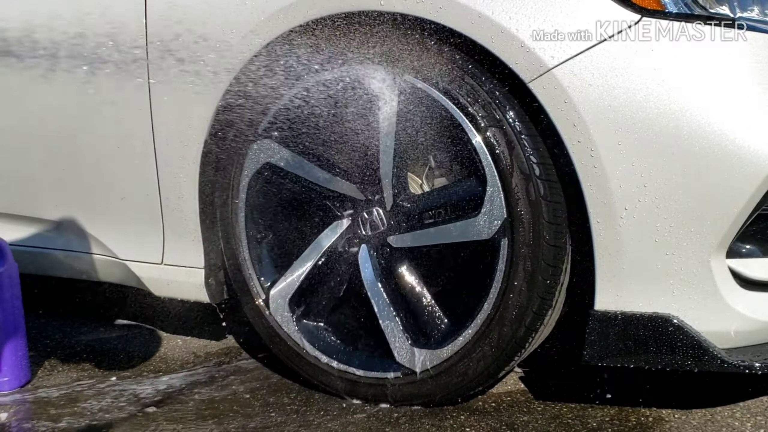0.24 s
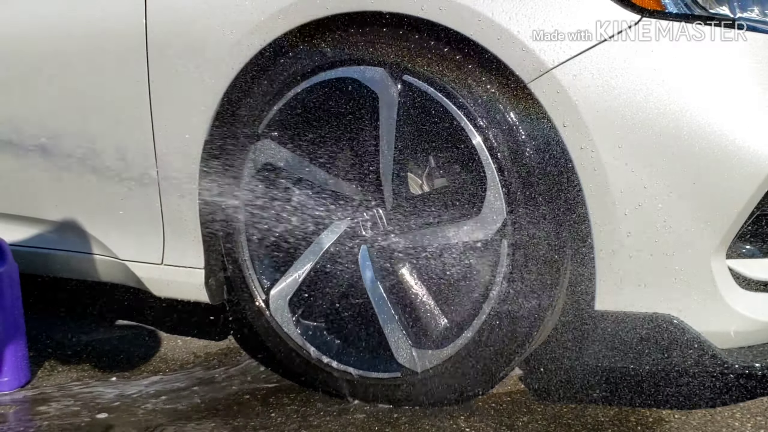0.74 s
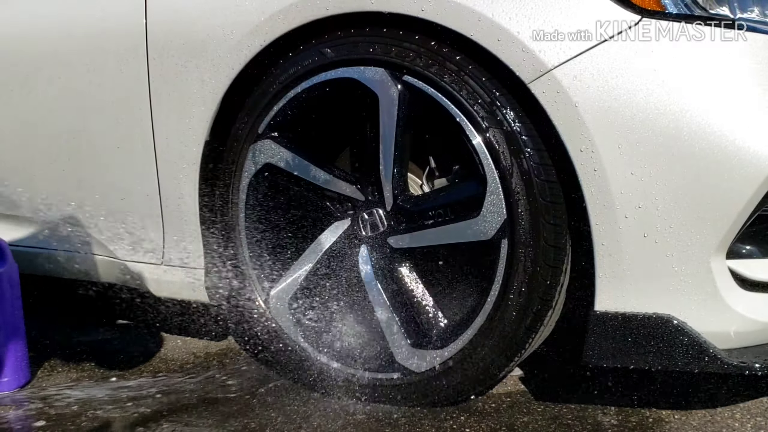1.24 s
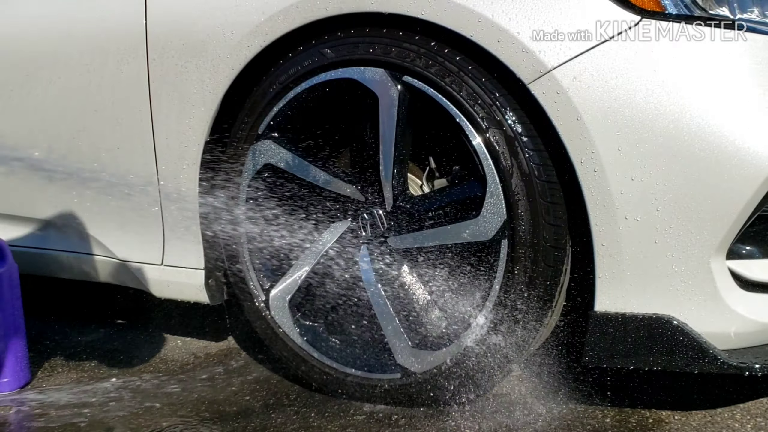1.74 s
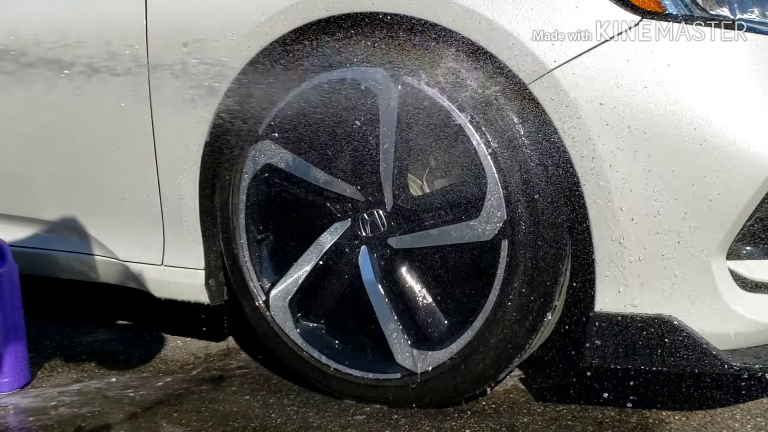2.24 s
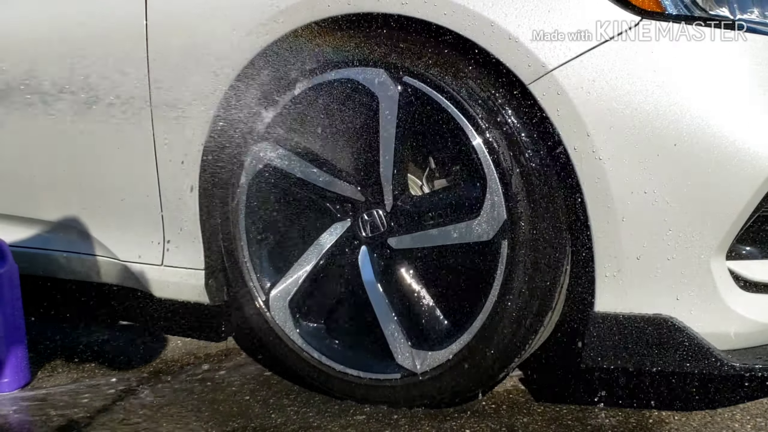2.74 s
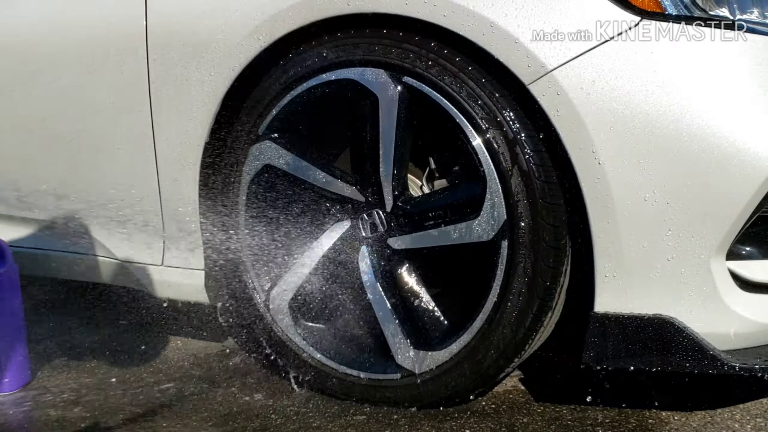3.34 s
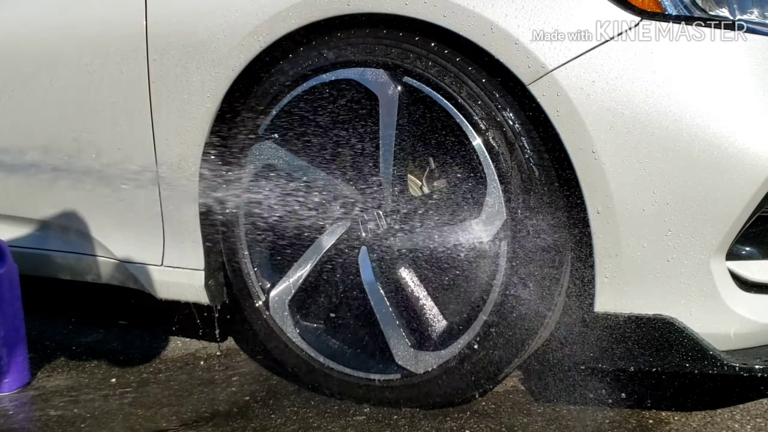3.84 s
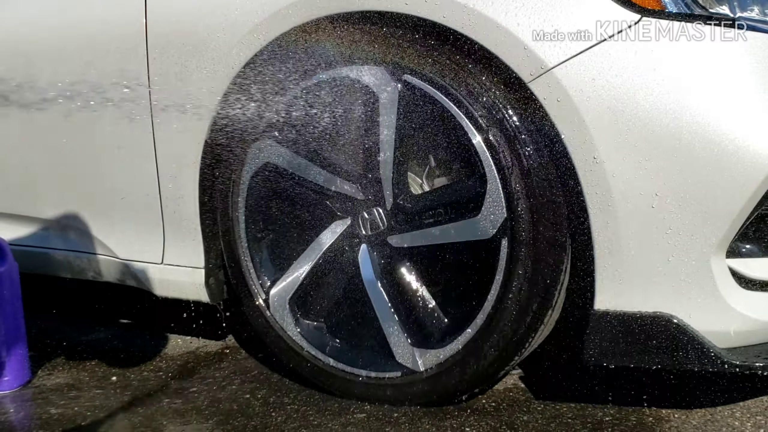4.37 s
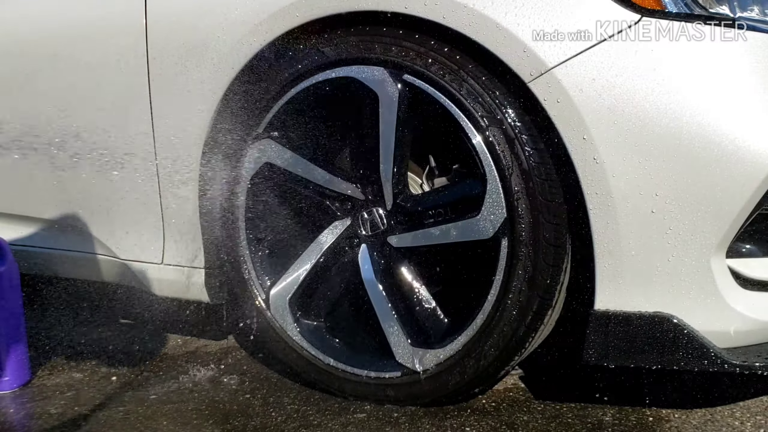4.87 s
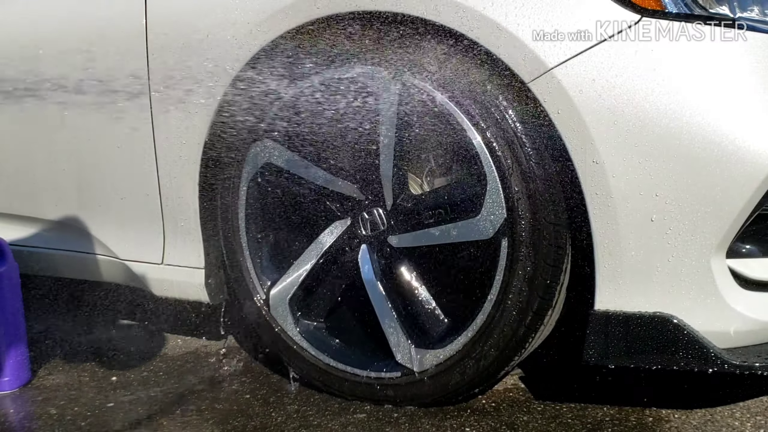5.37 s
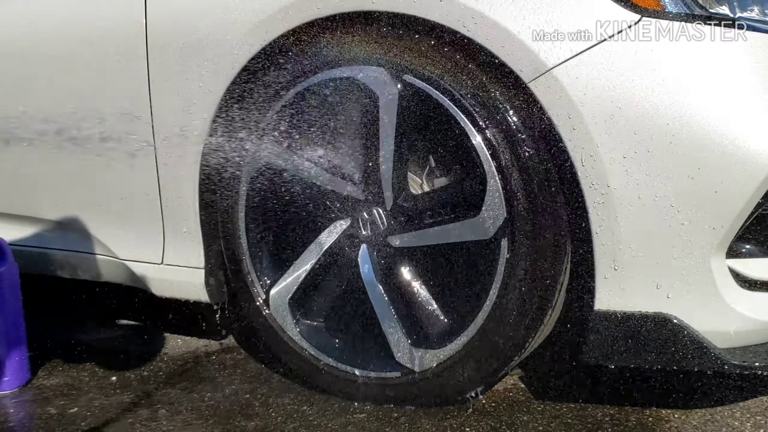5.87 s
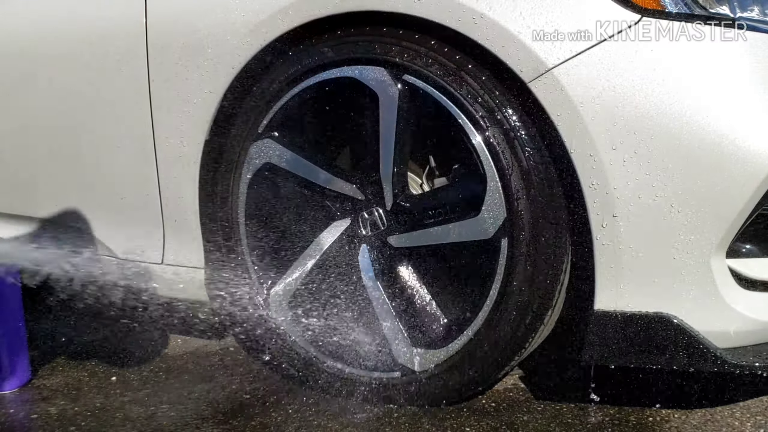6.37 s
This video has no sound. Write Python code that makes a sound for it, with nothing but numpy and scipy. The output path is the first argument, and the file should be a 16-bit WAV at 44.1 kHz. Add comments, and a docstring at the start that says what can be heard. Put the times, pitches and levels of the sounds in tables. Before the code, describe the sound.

A spluttering water jet sprays a wheel and tire, crackling with trapped air at first, then sizzling steadily with ticks and splashes.

```python
"""A hose jet swings over a car wheel in a driveway, nozzle left of a phone. From 0 s the nozzle hisses and spits
trapped air (noise and droplet bursts, last pocket at 3.2 s), mist and splatter patter on the wheel (random impacts),
and far traffic and light wind rumble (filtered noise). From 0.04 s panels drum (ringing patter), with knocks and gusts
from 0.5 s. Lumps of water slap the rim from 1.2 s (droplet bursts). Engine hums (wavering sines) swell most
at 1.5-2 s and 3.9-4.6 s; weaker gusts return from 5.4 s, the strongest comes at 6.3 s."""
import sys
import numpy as np
from scipy import signal
from scipy.fft import rfft, irfft, next_fast_len
from scipy.io import wavfile
from scipy.ndimage import uniform_filter1d, map_coordinates

SR = 44100
rng = np.random.default_rng(int(sys.argv[2]) if len(sys.argv) > 2 else 0)


def dump_mix(stems):
    """Bounce the given channels to the path in sys.argv[1] as a 16-bit WAV at rate SR."""
    frames = np.atleast_2d(stems).T  # one column per channel
    limited = np.clip(frames, -1, 1)  # hard clip at full scale
    pcm = np.round(limited * 32767).astype(np.int16)
    wavfile.write(sys.argv[1], SR, pcm)


N = 291497
T = np.arange(N) / SR

# Levels are relative, before mixing, flicker and microphone colour; spectra are shapes, normalised by voice().
# air pockets leaving the nozzle: t/s, length/s, blast level/dB, opening thump level/dB, coarse splutter level/dB
AIR_POCKETS = [(0.0, 0.0091, -25, -45, -44), (0.121, 0.013, -17.5, -28.5, -33.5),
               (1.353, 0.036, -17, -33.5, -34), (1.617, 0.014, -18, -33.5, -41.5),
               (1.955, 0.0095, -18.5, -34, -35.5), (2.145, 0.013, -17.5, -46, -36),
               (2.257, 0.023, -20.5, -35, -36.5), (2.569, 0.005, -18.5, -32.5, -43),
               (2.811, 0.0062, -18, -31.5, -45), (3.243, 0.011, -19.5, -38, -41)]
# force of the jet on the wheel: t/s, mist level/dB, splatter level/dB
JET_FORCE = [(0, -31, -42.5), (.5, -36.5, -44.5), (.95, -39.5, -44.5), (1.05, -36, -45.5),
             (1.3, -36.5, -44), (1.7, -36, -43.5), (2.45, -33, -44), (3.05, -37.5, -43), (3.55, -35, -45.5),
             (3.85, -40, -43.5), (4.42, -40.5, -44), (4.6, -37, -39), (4.75, -35.5, -45), (4.97, -39, -41),
             (5.1, -38, -43.5), (5.25, -36, -38), (5.31, -31.5, -40.5), (5.52, -29, -38.5),
             (5.78, -34.5, -38), (5.84, -35.5, -43.5), (6.05, -32, -40), (6.3, -31.5, -39.5),
             (6.61, -40, -42.5)]
# the hand turns the jet round, starting on the left: t/s
SWING_TURNS = [0, .78, 1.42, 1.98, 3.02, 3.95, 4.9, 5.68, 6.15, 6.8]
# the jet catches a spoke and the sizzle flares: t/s, mist rise/dB
SPOKE_FLARES = [(.7, 4), (1.03, 1.5), (1.14, 2), (1.48, 4), (3.69, 2.5), (3.99, 6), (4.27, 7), (4.65, 3),
                (4.84, 5.5), (5.09, 9), (5.74, 4.5), (6.36, 1.5), (6.53, 6.5)]
# the jet crosses hollow panels and the wheel arch: t/s, half length/s, level/dB, ring centre f/Hz
PANEL_DRUMS = [(0.037, .015, -46, 500), (0.105, .009, -42, 1100), (0.535, 0.071, -47, 1500),
               (0.61, 0.031, -45.5, 1620), (0.742, 0.082, -50.5, 610), (0.893, 0.043, -51, 1400),
               (2.053, 0.12, -51, 1150), (2.226, 0.01, -53, 1190), (3.502, 0.07, -50.5, 2230),
               (4.146, 0.0088, -42, 1550), (4.179, 0.011, -42.5, 1350), (4.21, 0.065, -50, 750),
               (4.227, 0.039, -42.5, 1330), (4.545, 0.02, -44.5, 2000), (4.581, .009, -40, 1000),
               (4.555, 0.13, -53, 1200), (4.99, 0.059, -47, 467), (5.872, 0.018, -41.5, 1330),
               (5.89, .025, -47.5, 480), (5.998, 0.033, -42, 1080)]
# dull knocks of water on the body: t/s, half length/s, level/dB
BODY_KNOCKS = [(.54, 0.013, -44.5), (.775, 0.013, -35.5), (5.41, 0.014, -46)]
# wind on the microphone: t/s, half length/s, level/dB
WIND_GUSTS = [(.6, 0.077, -42), (.78, 0.061, -43), (.99, 0.065, -40), (5.4, 0.45, -50), (5.42, 0.13, -47.5),
              (6.305, 0.058, -35), (6.42, 0.2, -45)]
# lumps of water slapping the wheel: t/s, level/dB
WATER_SLAPS = [(1.155, -21.5), (1.162, -29), (1.487, -25), (1.708, -22), (1.809, -31), (2.034, -23.5),
               (2.048, -28), (2.227, -27), (2.346, -26), (2.433, -32), (2.447, -28), (2.767, -37),
               (2.774, -24), (2.881, -22), (3.317, -33), (3.328, -38), (3.509, -34), (3.703, -26),
               (3.937, -34), (4.268, -25), (4.339, -33), (4.475, -29), (5.038, -32), (5.058, -28),
               (5.19, -22), (5.297, -23), (5.515, -23), (5.741, -25), (5.944, -26), (6.305, -32),
               (6.416, -24.5)]
# distant engines: peak t/s, half length/s, level/dB, mean pitch at peak f/Hz
ENGINE_SWELLS = [(1.548, 1.14, -53, 115.9), (2.004, 2.1, -58.5, 128), (3.896, 0.21, -54, 77),
                 (4.6, 1.05, -56.5, 132)]
# spectrum of the spit's blast: f/Hz, density/dB
SPIT_SPECTRUM = [(300, -37), (1250, -26), (2400, -12), (3100, -8.5), (3600, -9), (4500, -11), (6200, -1.5),
                 (8000, 1.5), (9700, 2.5), (12200, 3.5), (15500, -1.5)]
# spectrum of coarse splutter: f/Hz, density/dB
SPLUTTER_SPECTRUM = [(60, 3), (250, -5), (380, -5), (580, 2), (850, -1), (1250, 1), (2200, 2), (4000, -22),
                     (8000, -45)]
# spectrum of the rasp in the nozzle's bore: f/Hz, density/dB
RASP_SPECTRUM = [(2000, -35), (2800, -2.5), (3200, -0.5), (4600, -0.5), (6000, -9), (9000, -35)]
# spectrum of the opening thump: f/Hz, density/dB
THUMP_SPECTRUM = [(25, -14), (60, -12), (150, 7.5), (300, -4), (600, -7), (1200, -5), (3000, -48)]
# spectrum of fine water, also in slaps: f/Hz, density/dB
MIST_SPECTRUM = [(200, -29), (1500, -25.5), (3000, -10.5), (5000, -9), (6500, -3.5), (9500, -3.5),
                 (12000, -1.5), (14000, -2.5), (15500, -1.5)]
# spectrum of heavier drops on the wheel: f/Hz, density/dB
SPLATTER_SPECTRUM = [(100, -15), (300, -7.5), (600, -4.5), (1300, -1.5), (2000, -1.5), (3000, 2),
                     (4600, 1.5), (5500, -0.5), (8000, 0), (15000, -1.5)]
# spectrum of patter on panels, before their ring: f/Hz, density/dB
DRUM_SPECTRUM = [(100, -10), (280, -3.5), (700, -2.5), (1400, 0), (2000, -3), (2900, -3.5), (6000, -42)]
# spectrum of body knocks: f/Hz, density/dB
KNOCK_SPECTRUM = [(40, -7), (100, 4), (150, 5.5), (230, -7), (400, -17), (1200, -24)]
# spectrum of wind: f/Hz, density/dB
WIND_SPECTRUM = [(15, -36), (26, 1), (38, 1.5), (60, 2), (90, -3.5), (150, -13.5), (300, -41), (1000, -66)]
# spectrum of far traffic: f/Hz, density/dB
TRAFFIC_SPECTRUM = [(15, -32), (30, -15), (55, 1), (90, 0.5), (140, -4), (200, -8), (320, -16.5),
                    (700, -17.5), (2000, -22), (8000, -50)]
# nozzle sound scattered by car, driveway and house: delay/ms, amplitude fade/ms, level/dB
NOZZLE_ECHOES = [(2.98, 4.9, 0.5), (15.7, 9, -11), (28.5, 4.3, -6.5)]
# power share of patter arriving straight from the wheel, held within 0.02-0.98 in use: f/Hz, share/1
DIRECT_SHARE = [(300, 0.97), (1000, 0.45), (2000, 0.29), (3500, 0.71), (6000, 0.49), (15000, 0.01)]
# colour of the two microphone ports: f/Hz, left level/dB, right level/dB
PORT_COLOUR = [(100, 0, 0.35), (2000, -1.5, -1.3), (6200, -2.5, -2), (6350, -1.5, -5), (6850, -4.5, -9),
               (7860, 1, -8.5), (7980, 1, -6), (8150, -1.5, -6.5), (10200, -3.2, -3), (12600, 1.4, -1.3),
               (15000, 0.3, -1.2)]

LOW_CUT_HZ, TOP_HZ = 37, 15550
NOZZLE_LAG_MS = 0.27  # right port
GROUND_LAG_MS, GROUND_DB = 1.5, -11  # nearest reflection of the nozzle, at left swing
ECHO_SWAY_MS = 0.316  # extra lag of that reflection at right swing
OPENING_S = 0.003
LEFT_LAG_MS, RIGHT_LAG_MS = 0.1, -0.069  # lag of the right port at either end of a swing
SPOKE_HALF_S = 0.054
FLIGHT_S = 0.066  # nozzle to wheel
DRUM_EDGE = 0.68  # slide on to or off a panel, as a share of the half length
TRAFFIC_WAVER_DB = 1.7
ENGINE_RISE_HZ_PER_S = 0.5


def undb(db):
    """Decibels to gain."""
    return 10 ** (np.asarray(db) / 20)


def unit(x):
    """Scale to rms 1."""
    return x / np.sqrt(np.mean(x ** 2))


def curves(rows):
    """Each column of a (t/s, ..) table at every sample."""
    s, *columns = np.transpose(rows)
    return [np.interp(T, s, c) for c in columns]


def colour(x, points):
    """Filter by a response interpolated in dB over log frequency."""
    hz, db = np.transpose(points)
    size = next_fast_len(N + 8192)
    bins_hz = np.maximum(np.fft.rfftfreq(size, 1 / SR), 1)
    gain = undb(np.interp(np.log(bins_hz), np.log(hz), db))
    return irfft(rfft(x, size) * gain, size)[..., :N]


def voice(x, spectrum):
    """Colour a white excitation, keeping its rms when only power below TOP_HZ counts."""
    hz, db = np.transpose(spectrum)
    gains = undb(np.interp(np.log(np.arange(10, TOP_HZ, 10)), np.log(hz), db))
    return colour(x, spectrum) / np.sqrt(np.mean(gains ** 2) * 2 * TOP_HZ / SR)


def delay(x, ms):
    """Delay by a fixed or moving time."""
    return map_coordinates(x, [np.arange(N) - ms * SR / 1000], order=3)


def walk(rate_hz):
    """Random levels held 1 / rate_hz and slewed twice; rms 1."""
    hold = max(int(SR / rate_hz), 2)
    steps = np.repeat(rng.standard_normal(N // hold + 1), hold)[:N]
    return unit(uniform_filter1d(uniform_filter1d(steps, hold), hold))


def bell(s, half_s):
    """Gaussian rise and fall around a moment; top 1."""
    return np.exp(-((T - s) / half_s) ** 2 / 2)


def swells(rows):
    """Power sum of bells from (t/s, half length/s, level/dB) rows."""
    return np.sqrt(sum((undb(db) * bell(s, half_s)) ** 2 for s, half_s, db in rows))


def stereo_noise(likeness):
    """Two noises with a common share of power."""
    common = np.sqrt(likeness) * rng.standard_normal(N)
    return common + np.sqrt(1 - likeness) * rng.standard_normal((2, N))


def drops(rate_hz, spread_db):
    """Random impacts of either sign, sizes spread exponentially in dB; rms 1."""
    falls = rng.random(N) < rate_hz / SR
    size = undb(spread_db * np.minimum(rng.exponential(size=N), 2 * np.pi))
    return unit(falls * size * rng.choice([-1, 1], N))


def sputter(rate_hz, fade_s, share):
    """Gain of a flow partly in random spurts, each starting at once and dying away; rms 1."""
    kicks = (rng.random(N) < rate_hz / SR) * (1 + rng.random(N))
    power = signal.lfilter([1], [1, -np.exp(-1 / (fade_s * SR))], kicks)
    return np.sqrt(1 - share + share * power / np.mean(power))


def swing():
    """Jet aim, 0 (left) to 1 (right); the hand slows into each turn."""
    turn = np.interp(T, SWING_TURNS, np.arange(len(SWING_TURNS)))
    return (1 - np.cos(np.pi * turn)) / 2


def flicker(x, depth_db):
    """Every narrow band swells and fades on its own within a few hundredths of a second."""
    _, _, bands = signal.stft(x, nperseg=512)
    chance = rng.standard_normal(bands.shape)
    chance = uniform_filter1d(uniform_filter1d(chance, size=3, axis=1), size=4, axis=2)
    gain = unit(undb(depth_db * unit(chance)))
    return signal.istft(bands * gain)[1][:, :N]


def scattered(x):
    """Echoes off uneven surfaces: short fading clusters of paths, different at each port."""
    ms = 1000 * T[:SR // 10]
    power = 0
    for lag_ms, fade_ms, db in NOZZLE_ECHOES:
        fade = (ms >= lag_ms) * np.exp(-2 * np.abs(ms - lag_ms) / fade_ms)
        power = power + undb(db) ** 2 * fade * 2 * ms[1] / fade_ms
    paths = rng.standard_normal((2, len(ms))) * np.sqrt(power)
    return signal.fftconvolve(x[None], paths, axes=1)[:, :N]


def nozzle(rasp_db_per_root_s=4.5, fall_s=0.007, mist_s=0.035, mist_per_length=.5, mist_db=-10.0,
           hiss_db=-46, thump_s=0.011, far_port_db=-1.5, push_db=4, push_hz=60, push_s=0.013):
    """Hiss; each air pocket thumps, pushes air, blasts, splutters and rasps, then leaves a lingering mist."""
    blast, coarse, rasp, mist, thump, push = undb(hiss_db), undb(-65.5), 0, 0, 0, 0
    for s, length_s, db, thump_db, coarse_db in AIR_POCKETS:
        before_s, age_s = np.maximum(s - T, 0), np.maximum(T - s, 0)
        after_s = np.maximum(T - s - length_s, 0)
        opening = np.exp(-before_s / OPENING_S - after_s / fall_s)
        blast = blast + undb(db) * opening
        coarse = coarse + undb(coarse_db) * opening
        # long pockets rasp more and leave mist for longer
        rasp = rasp + undb(db + rasp_db_per_root_s) * np.sqrt(length_s) * opening
        linger = np.exp(-after_s / (mist_s + mist_per_length * length_s))
        mist = mist + undb(db + mist_db) * (1 - np.exp(-age_s / OPENING_S)) * linger
        thump = thump + undb(thump_db) * np.exp(-before_s / 0.0062 - age_s / thump_s)
        push_wave = np.exp(-age_s / push_s) * np.sin(2 * np.pi * push_hz * age_s)
        push = push + undb(thump_db + push_db) * push_wave
    # water and air take turns in the orifice: crackling blast, ragged mist
    blast = blast * sputter(rate_hz=600, fade_s=0.00061, share=0.29)
    mist = mist * sputter(rate_hz=150, fade_s=0.0024, share=0.3)
    air = voice(drops(rate_hz=11000, spread_db=2.0) * blast, SPIT_SPECTRUM)
    air = air + voice(drops(rate_hz=7000, spread_db=-0.3) * mist, MIST_SPECTRUM)
    air = air + voice(drops(rate_hz=2500, spread_db=2.0) * coarse, SPLUTTER_SPECTRUM)
    air = air + voice(drops(rate_hz=3300, spread_db=1.5) * rasp, RASP_SPECTRUM)
    puff = voice(rng.standard_normal(N) * thump, THUMP_SPECTRUM) + push
    out = np.array([air + puff, delay(air + undb(-12.5) * puff, NOZZLE_LAG_MS)])
    ground = undb(GROUND_DB) * delay(air, GROUND_LAG_MS + ECHO_SWAY_MS * swing())
    out = out + ground + scattered(air)
    cloud = voice(rng.standard_normal((2, N)) * blast, SPIT_SPECTRUM)
    cloud = cloud + voice(rng.standard_normal((2, N)) * mist, MIST_SPECTRUM)
    return (undb(-1.0) * out + undb(-6.0) * cloud) * undb([[0], [far_port_db]])


def from_wheel(patter, loudness, pan_db_per_ms=11):
    """Impacts from where the jet lands, plus diffuse wash scattered by spokes and wheel well."""
    lag_ms = LEFT_LAG_MS + (RIGHT_LAG_MS - LEFT_LAG_MS) * swing()
    hz, share = np.transpose(DIRECT_SHARE)
    share = np.clip(share, .02, .98)
    direct = colour(patter * loudness, np.c_[hz, 10 * np.log10(share)])
    # spatter thrown off by impacts follows the patter within a millisecond
    spatter = np.sqrt(np.abs(uniform_filter1d(patter ** 2, size=24)))
    wash = rng.standard_normal((2, N)) * spatter * loudness
    wash = colour(wash, np.c_[hz, 10 * np.log10(1 - share)])
    pan_db = pan_db_per_ms * lag_ms * np.array([[1], [-1]]) / 2
    return (np.array([direct, delay(direct, lag_ms)]) + wash) * undb(pan_db)


def spray(gap_db=3.0, gap_half_s=0.0082, tick_db=-12, clump_db=0.5, spoke_splatter=0.13,
          right_splatter_db=0.57):
    """Fine mist sizzles, lone drops tick on the rim and heavier ones splatter, in uneven clumps."""
    mist_db, splatter_db = curves(JET_FORCE)
    # each air pocket's gap in the jet reaches the wheel a flight time later
    gaps = sum(bell(s + FLIGHT_S, gap_half_s) for s, *_ in AIR_POCKETS)
    flow_db = clump_db * walk(12) + 0.73 * walk(45) - gap_db * gaps
    flare_db = sum(db * bell(s, SPOKE_HALF_S) for s, db in SPOKE_FLARES)
    mist_db = mist_db + flow_db + flare_db
    splatter_db = splatter_db + flow_db + spoke_splatter * flare_db + right_splatter_db * swing()
    fine = drops(rate_hz=12000, spread_db=2.0) + undb(tick_db) * drops(rate_hz=380, spread_db=5.5)
    heavy = drops(rate_hz=7000, spread_db=0.0)
    mist_gain = undb(mist_db) * sputter(rate_hz=190, fade_s=.003, share=0.14)
    splatter_gain = undb(splatter_db) * sputter(rate_hz=120, fade_s=0.01, share=0.15)
    mist = voice(from_wheel(fine, mist_gain), MIST_SPECTRUM)
    return mist + voice(from_wheel(heavy, splatter_gain), SPLATTER_SPECTRUM)


def outdoors(waver_db=3.0, breeze_db=-58):
    """Traffic noise, wavering engine sines, and breeze with gusts hitting each port largely separately."""
    traffic = stereo_noise(0.87) * undb(-51.5 + TRAFFIC_WAVER_DB * walk(6))
    traffic = voice(traffic, TRAFFIC_SPECTRUM)
    wind_gain = (undb(breeze_db) + swells(WIND_GUSTS)) * undb(2.6 * walk(11))
    wind = voice(stereo_noise(0.19) * wind_gain, WIND_SPECTRUM)
    hum = 0
    for s, half_s, db, hz in ENGINE_SWELLS:
        pitch_hz = hz + ENGINE_RISE_HZ_PER_S * (T - s) + 1.62 * walk(14)
        phase = 2 * np.pi * np.cumsum(pitch_hz) / SR
        gain = np.sqrt(2) * undb(db + waver_db * walk(8.7)) * bell(s, half_s)
        hum = hum + gain * np.sin(phase)
    return traffic + wind + hum


def bodywork(ring_db=4, ring_q=2.5, clump_db=0.1):
    """Heavy drops excite hollow panels, each with its own broad resonance; some give dull knocks."""
    patter = from_wheel(drops(rate_hz=4000, spread_db=1.5), undb(clump_db * walk(90)))
    patter = voice(patter, DRUM_SPECTRUM)
    out = voice(stereo_noise(0.81) * swells(BODY_KNOCKS), KNOCK_SPECTRUM)
    for s, half_s, db, hz in PANEL_DRUMS:
        ring = signal.lfilter(*signal.iirpeak(hz, ring_q, fs=SR), patter)
        on_panel = (1 + np.tanh((half_s - np.abs(T - s)) / (DRUM_EDGE * half_s))) / 2
        out = out + unit(patter + undb(ring_db) * ring) * undb(db) * on_panel
    return out


def slaps(burst_s=0.0018):
    """Each lump of water bursts on the rim: droplets start at once and decay within milliseconds."""
    burst = sum(undb(db) * (T >= s) * np.exp(-np.abs(T - s) / burst_s) for s, db in WATER_SLAPS)
    splash = from_wheel(drops(rate_hz=7200, spread_db=-1.0), burst)
    return voice(splash, MIST_SPECTRUM)


def scene():
    """Nozzle, wheel and surroundings; spray, panels and nozzle flicker in colour."""
    water = flicker(nozzle(), depth_db=1.9) + flicker(spray() + bodywork(), depth_db=3.0)
    return water + outdoors() + slaps()


def record(dry):
    """Each port colours the treble its own way; the phone cuts the deepest bass and the top."""
    ports = np.array(PORT_COLOUR)
    heard = np.array([colour(x, np.c_[ports[:, 0], db]) for x, db in zip(dry, ports.T[1:])])
    low_cut = signal.butter(4, LOW_CUT_HZ, "highpass", fs=SR, output="sos")
    top_cut = signal.ellip(10, .2, 80, TOP_HZ, fs=SR, output="sos")
    return signal.sosfilt(top_cut, signal.sosfilt(low_cut, heard))


dry = scene()
out = record(dry)
dump_mix(out)
```